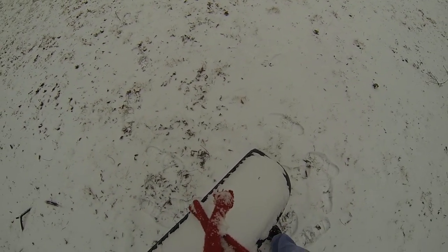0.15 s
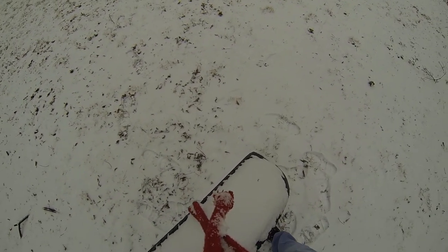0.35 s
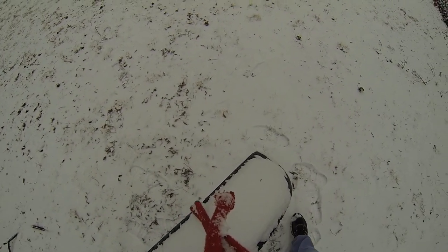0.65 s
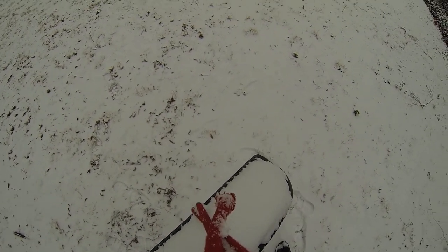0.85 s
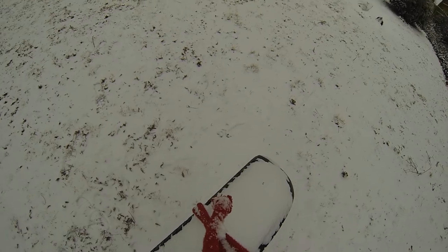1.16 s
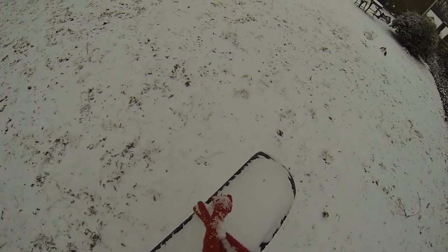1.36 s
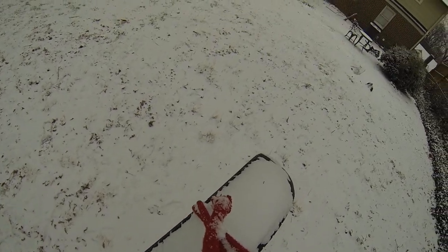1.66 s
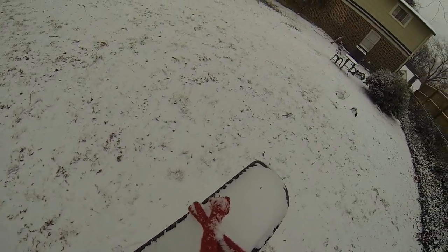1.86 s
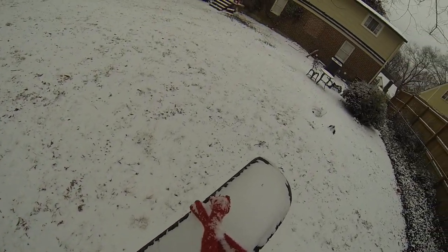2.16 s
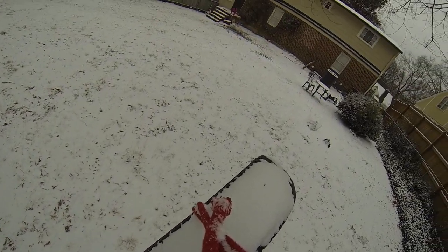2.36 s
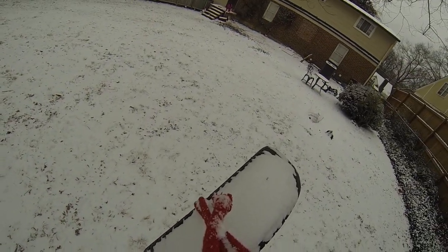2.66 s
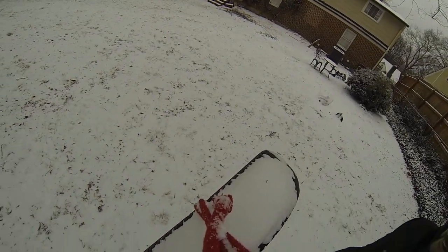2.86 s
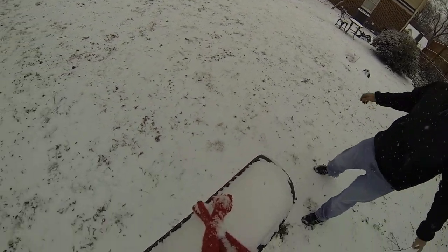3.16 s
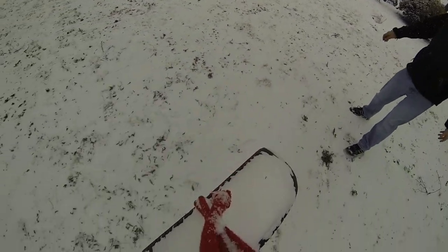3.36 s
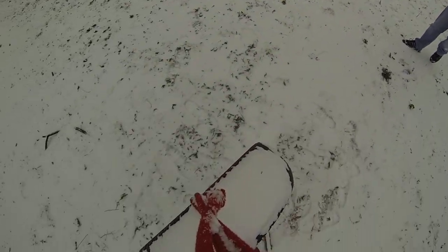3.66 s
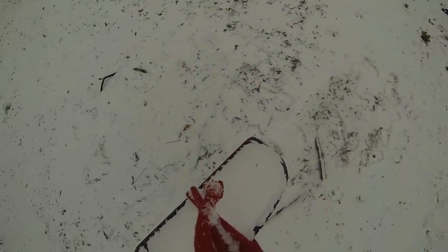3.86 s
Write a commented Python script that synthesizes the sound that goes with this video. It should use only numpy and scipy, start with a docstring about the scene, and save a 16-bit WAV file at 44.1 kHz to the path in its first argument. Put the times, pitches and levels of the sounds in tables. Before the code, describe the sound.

Low handling rumble and muffled wind rush swell in bursts, with dull knocks and thuds.

```python
"""A snowy yard, heard by a small camera in a sealed plastic housing on a board that is swung about.
Rushing air and grit are noise and sparse grains through the colour of the shell; the mount's bass
shaking is noise through resonances, its thuds are damped sines of sagging pitch. Dull knocks are
noise pushes ringing the cavity, ticks are cracks ringing shell modes; microphone hiss lies beneath."""
import sys
import numpy as np
from scipy import signal
from scipy.fft import rfft, irfft
from scipy.io import wavfile
from scipy.ndimage import uniform_filter1d

SR = 44100
rng = np.random.default_rng(int(sys.argv[2]) if len(sys.argv) > 2 else 0)


def decibels_to_gain(level_db):
    """Convert a level in decibels to a linear amplitude gain (20 dB per decade)."""
    exponent = np.asarray(level_db, float) / 20
    return 10 ** exponent


def file_out(sig):
    """Save sig as 16-bit WAV at sys.argv[1]."""
    # one column per channel
    cols = np.atleast_2d(sig).T
    # limit, then scale
    lim = np.clip(cols, -1, 1)
    pcm = np.round(lim * 32767).astype(np.int16)
    wavfile.write(sys.argv[1], SR, pcm)


N = 176400
T = np.arange(N) / SR

# colour of the shell around the microphone: [f/Hz, relative level/dB]
SHELL_COLOUR = [(200, -16.5), (290, -23), (365, -15), (470, -21.5), (800, -17), (1150, -7), (1450, 2),
                (1680, -3), (1850, -14.5), (2500, -24), (2750, -31.5), (3100, -35), (3900, -38.5),
                (4600, -39.5), (5500, -50.5), (9000, -65.5), (15000, -70)]


def level(x, db):
    """Scale to an rms level."""
    return x * decibels_to_gain(db) / np.sqrt(np.mean(x ** 2))


def curve(table, axis):
    """One column of a table, or of a list of tables, joined by straight lines in time."""
    rows = np.vstack(table)
    return np.interp(T, rows[:, 0], rows[:, axis])


def colour(x, points, lo_hz=0, hi_hz=SR):
    """Minimum-phase filter through (Hz, dB) points, soft-edged at lo_hz and hi_hz."""
    hz = np.maximum(np.arange(2049) * SR / 4096, 1)
    rows = np.array(points)
    db = np.interp(np.log(hz), np.log(rows[:, 0]), rows[:, 1])
    db -= 10 * np.log10((1 + (lo_hz / hz) ** 6) * (1 + (hz / hi_hz) ** 6))
    db -= 10 * np.log10(1 + (rows[0, 0] / hz) ** 4)  # roll-off below the first point
    # folding the cepstrum makes the response causal
    cepstrum = irfft(db * np.log(10) / 20)
    cepstrum[1:2048] *= 2
    cepstrum[2049:] = 0
    response = irfft(np.exp(rfft(cepstrum)))
    return signal.fftconvolve(x, response)[:N]


def band(x, hz, width_hz):
    """A resonance applied twice."""
    b, a = signal.iirpeak(hz, hz / width_hz, fs=SR)
    return signal.lfilter(b, a, signal.lfilter(b, a, x))


def walk(rate_per_s):
    """Random levels held 1 / rate_per_s and slewed twice; spread near 1."""
    hold = int(SR / rate_per_s)
    steps = np.repeat(rng.standard_normal(N // hold + 1), hold)
    return 1.3 * uniform_filter1d(uniform_filter1d(steps, hold), hold)[:N]


def add(out, t, x):
    """Mix x into out from time t."""
    i = int(t * SR)
    out[i:i + len(x)] += x[:N - i]


def rush():
    """Flickering air noise and grains of grit; body, cavity and treble waver partly separately."""
    # air over the housing: [t/s, relative level/dB, treble re cavity/dB, body re cavity/dB]
    air = [(0, -75, 5, -4), (.45, -69.5, -0.5, -1), (.7, -71, 2, 2), (.85, -61.5, 1.5, 0.5),
           (1.0, -53.5, -1.5, 0), (1.15, -49.5, 2, -2), (1.3, -44.5, 0.5, -6), (1.42, -44, 4.5, 0),
           (1.48, -49.5, 1.5, -2), (1.51, -51.5, -6.5, 5), (1.62, -55, -3.5, 3.5), (1.72, -56, -0.5, 3.5),
           (1.85, -50, 1.5, 2), (1.95, -43.5, -7.5, 6), (2.08, -48, -5, 5.5), (2.2, -53, -4, 2.5),
           (2.4, -53.5, -6, 6), (2.6, -52, -5.5, 6), (2.66, -60.5, -1, 5), (2.8, -54, -5, 2.5),
           (2.95, -47.5, -3.5, 2.5), (3.1, -38.5, -2.5, 2), (3.22, -38, -4, -1), (3.3, -42, -2, 2.5),
           (3.41, -46.5, 2, 0), (3.45, -43.5, -0.5, 2), (3.6, -39, -3, -1), (3.7, -40.5, 0, 1.5),
           (3.77, -42.5, 0.5, -7.5), (3.82, -43.5, 1, -1.5), (3.87, -38, 0, -5.5), (3.93, -42, 3.5, -8),
           (4, -43.5, 2.5, -3)]
    grit_per_s, grit_spread_db, grit_re_air_db = 1200, 3, 0.5
    shared_flicker_db, shared_per_s = 0.26, 45
    own_flicker_db, own_per_s = 0.79, 25.3

    grains = (rng.random(N) < grit_per_s / SR) * rng.standard_normal(N)
    grains *= decibels_to_gain(grit_spread_db * np.minimum(rng.exponential(size=N), 4))
    drive = rng.standard_normal(N) + level(grains, grit_re_air_db)
    shared_db = shared_flicker_db * walk(shared_per_s)

    def part(lo_hz, hi_hz):
        flicker = decibels_to_gain(shared_db + own_flicker_db * walk(own_per_s))
        return colour(drive, SHELL_COLOUR, lo_hz, hi_hz) * flicker

    body, cavity, treble = part(0, 780), part(900, 1708), part(2000, SR)
    mix = decibels_to_gain(curve(air, axis=3)) * body + cavity + decibels_to_gain(curve(air, axis=2)) * treble
    return decibels_to_gain(curve(air, axis=1) + 8.5) * mix / np.std(cavity)


def shake():
    """Board and mount modes pushed by random forces, their swells partly evened out."""
    # shaking by phase of the swing: [t/s, relative level/dB, upper re lower modes/dB]
    phases = [
        [(0.0, -47, -21), (0.054, -69, 8), (0.072, -63, -0.5), (0.206, -64, -3), (0.286, -52, 4),
         (0.368, -70, 18.5), (0.382, -56, -10), (0.414, -44, -13), (0.468, -54, -14), (0.648, -63, 3),
         (0.682, -48.5, -4), (0.766, -66, -21.5), (0.814, -48, -14), (0.846, -73, 20), (0.876, -58, 5),
         (0.904, -75, 19), (0.942, -50, -11), (1.012, -70.5, 17.5), (1.084, -48.5, -17), (1.118, -51, 3),
         (1.17, -52, -8), (1.24, -53, -1)],
        [(1.25, -61, -6), (1.288, -33, 2.5), (1.302, -30, -2), (1.342, -30, -14), (1.374, -40, 0),
         (1.4, -40, -12), (1.422, -52, 5), (1.442, -48.5, 3.5), (1.462, -57, 4), (1.488, -45, -2),
         (1.518, -54, 4.5), (1.544, -40, -7), (1.566, -38, 2), (1.594, -35.5, -7), (1.634, -47, 8.5),
         (1.668, -33.5, 0), (1.724, -40, -16), (1.738, -35.5, 2), (1.76, -28, 1), (1.792, -46, -2),
         (1.84, -41, 3)],
        [(1.85, -36.5, 1), (1.872, -19.5, 1.5), (1.902, -24, -1), (1.922, -18.5, -1.5), (1.968, -17.5, -5.5),
         (2.006, -30.5, 7.5), (2.05, -24, -10), (2.1, -37.5, 5), (2.124, -26, 6), (2.164, -35, 0),
         (2.268, -32, -10.5), (2.29, -49, -1), (2.314, -32.5, -9), (2.33, -29.5, -13), (2.358, -43, 9),
         (2.378, -34, -5.5), (2.444, -31.5, -11.5), (2.482, -41.5, -2), (2.568, -33.5, -5.5),
         (2.602, -42.5, 3.5), (2.64, -44.5, -0.5)],
        [(2.65, -53, 3), (2.68, -59, 5), (2.704, -45, -8), (2.724, -43, -12), (2.75, -57, 1), (2.84, -50, 5),
         (2.864, -57, -10), (2.9, -46, 3), (2.972, -52, 6.5), (3.066, -44.5, 2.5), (3.088, -48.5, 16),
         (3.112, -48, 5), (3.146, -46, 16), (3.188, -42, 0), (3.204, -37.5, 0), (3.222, -35.5, 8),
         (3.26, -46, 14.5), (3.298, -48, 7), (3.35, -33, 0.5), (3.384, -41, -8), (3.41, -32, 1.5)],
        [(3.42, -34.5, -4), (3.448, -25, 8), (3.486, -15.5, -9), (3.518, -23, 7.5), (3.552, -13.5, -12),
         (3.58, -24, 3.5), (3.6, -14.5, -16), (3.628, -19.5, -10.5), (3.652, -14, -1), (3.7, -11, -19.5),
         (3.746, -29, -12), (3.768, -30, -17), (3.782, -23, 4), (3.802, -11, -5), (3.83, -10, -13),
         (3.85, -9.5, -8.5), (3.894, -32, -5.5), (3.914, -30, -14), (3.93, -26.5, 2.5), (3.948, -16.5, 3),
         (4.0, -15, -4.5)],
    ]
    # lower modes of board and mount: [f/Hz, width/Hz, relative level/dB]
    low_modes = [(23.4, 12.3, -5), (40, 14.4, -2.5), (61.47, 14.6, -1.5)]
    # upper modes of board and mount: [f/Hz, width/Hz, relative level/dB]
    high_modes = [(112.3, 27.8, 0.5), (145.2, 30.5, -2.5), (214.6, 58, -12), (344.5, 61, -23),
                  (536, 150, -24)]
    flutter_db, flutter_per_s = 1.5, 30
    evening = 0.4  # 0 none, 1 nearly flat

    def swing(modes):
        x = sum(level(band(rng.standard_normal(N), hz, width_hz), db) for hz, width_hz, db in modes)
        envelope = uniform_filter1d(np.abs(signal.hilbert(x)), 600) / np.std(x)
        return level(x / (envelope + .15) ** evening, 0)

    shake_db = curve(phases, axis=1) - 0.5 + flutter_db * walk(flutter_per_s)
    return decibels_to_gain(shake_db) * (swing(low_modes) + decibels_to_gain(curve(phases, axis=2)) * swing(high_modes))


def hiss():
    """Steady coloured noise of the microphone."""
    # hiss spectrum: [f/Hz, relative level/dB]
    spectrum = [(200, -4.5), (400, -9), (900, -11.5), (1450, -2.5), (1900, -13), (2500, -20), (3100, -14),
                (4000, -22.5), (4800, -20.5), (6500, -26.5), (8500, -28), (10000, -24), (11000, -33.5),
                (12800, -26), (15000, -40)]
    return level(colour(rng.standard_normal(N), spectrum), -63.5)


def knocks():
    """One short rough push per knock drives both shell body and cavity, in its own balance."""
    # dull knocks: [t/s, relative level/dB, decay time constant/s, body re cavity drive/dB]
    pushes = [(0.016, -45, 0.0063, 5.5), (0.1336, -49.5, 0.01, 9.5), (0.2995, -48.5, 0.0054, 19),
              (0.876, -48.5, 0.011, 14.5), (0.9106, -39, 0.006, 14), (1.2915, -28.5, 0.006, 11.5),
              (1.6412, -41, 0.0081, 18), (1.7423, -31, 0.0078, 10), (1.7993, -31.5, 0.006, 10),
              (1.8196, -25.5, 0.007, 15.5), (1.831, -30, 0.0067, 12), (1.866, -15, 0.0051, 9.5),
              (1.8986, -39, 0.018, 5), (1.923, -16, 0.006, 6), (1.945, -24.5, 0.0056, 5),
              (2.0112, -27, 0.0076, 14.5), (2.028, -37, 0.0041, 15), (2.1083, -29.5, 0.006, 17),
              (2.3065, -35, 0.0085, 13), (2.6026, -40, 0.0036, 15), (3.0724, -23, 0.0027, 11.0),
              (3.123, -25.5, 0.0043, 8), (3.208, -22.5, 0.0056, 6), (3.3174, -26, 0.006, 9),
              (3.336, -27, 0.006, 8), (3.363, -28, 0.0051, 3.5), (3.4257, -27, 0.006, 17.5),
              (3.4381, -16.5, 0.0062, 15.5), (3.486, -22.5, 0.017, 8), (3.5067, -15, 0.006, 10.5),
              (3.5274, -24, 0.0054, 10), (3.5594, -15.5, 0.0056, 8), (3.5844, -25, 0.006, 7.5),
              (3.6, -26.5, 0.0045, 11.0), (3.6434, -14.5, 0.0052, 16), (3.68, -27, 0.0077, 15),
              (3.702, -28, 0.006, 11.5), (3.752, -27, 0.0051, 9.5), (3.7884, -14, 0.004, 15),
              (3.7954, -9.5, 0.0055, 10.5), (3.826, -23.5, 0.0064, 15.5), (3.8414, -28, 0.004, 12),
              (3.897, -20.5, 0.0044, 6), (3.895, -17.5, 0.006, 5), (3.908, -25, 0.003, 10),
              (3.941, -21, 0.0028, 12), (3.9483, -11.5, 0.006, 10), (3.986, -31, 0.0042, 17)]
    rise_s, cavity_top_hz, body_top_hz = 0.0018, 2580, 670
    cavity, body, t = np.zeros(N), np.zeros(N), T[:SR // 20]
    for start_s, db, decay_s, body_db in pushes:
        noise = rng.standard_normal(len(t))
        push = decibels_to_gain(db) * noise * np.exp(-t / decay_s) * (1 - np.exp(-t / rise_s))
        add(cavity, start_s, push)
        add(body, start_s, decibels_to_gain(body_db) * push)
    cavity = colour(cavity, SHELL_COLOUR, 900, cavity_top_hz)
    body = colour(body, SHELL_COLOUR, 0, body_top_hz)
    return decibels_to_gain(16) * (cavity + body)


def thuds():
    """Each thud through the mount is a damped swing whose pitch sags."""
    # thuds: [t/s, level before rise and decay/dB, nominal f/Hz, t60/s]
    blows = [(.289, -35, 101, 0.16), (0.403, -28, 58, 0.096), (1.288, -16, 114, 0.097),
             (1.743, -12, 126, 0.044), (1.819, -11, 156, 0.033), (1.869, -10.5, 120.8, 0.027),
             (1.916, -9.5, 110, 0.14), (2.111, -12, 154.4, .1), (2.312, -18, 110, 0.057),
             (3.214, -20, 127, 0.18), (3.438, -25.5, 140, .08), (3.49, -6, 103, 0.092),
             (3.512, -2.5, 115, 0.13), (3.644, 3.5, 106.5, 0.043), (3.794, 7, 75.8, 0.041),
             (3.828, -7.5, 58.1, 0.14), (3.945, -2.5, 90.4, 0.14)]
    rise_s, sag, sag_s = 0.004, 0.45, 0.02
    out, t = np.zeros(N), T[:SR // 4]
    # pitch falls from about 1.2 to 0.55 of nominal
    cycles_per_hz = t * (1 - sag) + sag * 0.029 * (1 - np.exp(-t / sag_s))
    for start_s, db, hz, t60_s in blows:
        envelope = decibels_to_gain(db - 60 * t / t60_s) * (1 - np.exp(-t / rise_s))
        add(out, start_s, -envelope * np.cos(2 * np.pi * hz * cycles_per_hz))
    return out


def ticks():
    """Each tick is a dry crack plus ringing shell modes, newly tuned; its tilt sets the brightness."""
    # ticks on the shell: [t/s, relative level/dB, brightness/(dB per octave)]
    contacts = [(0.356, -15, 2.5), (0.3943, -46, 1), (0.3966, -34, 3), (0.41, -54.5, -2.0),
                (0.4193, -41, 4), (0.447, -45, 4), (0.4614, -62, -2.0), (0.4754, -53, 8), (1.2235, -45, 0),
                (1.248, -54, -2.0), (1.264, -38, -10), (1.2656, -39, -2.0), (1.275, -24.5, 5.5),
                (1.3477, -45, -5), (1.3834, -52, -2.0), (1.4207, -32, 3), (1.4284, -52, -2.0),
                (1.7992, -43, -8), (1.8885, -51, -2.0), (1.9035, -42, -9), (1.9123, -42, -14),
                (1.926, -25.5, -13), (1.9344, -28, -2.5), (1.9424, -44, -10), (2.0387, -34, -3.5),
                (2.0642, -45, -4), (2.1745, -60, -7), (2.1854, -46, -2.0), (2.2851, -42, -8),
                (2.3044, -45, -5), (2.355, -47, -2.0), (3.014, -46, 1), (3.0433, -29.5, -7.5),
                (3.0724, -28, -10.5), (3.1525, -60, 9), (3.188, -37.5, -15), (3.3368, -63, -3),
                (3.642, -30, -17), (3.6494, -33.5, -11.5), (3.7213, -34, -11), (3.7525, -31, -5),
                (3.793, -54.5, -2.0), (3.8027, -31, -4.5), (3.816, -40.5, -1), (3.843, -34.5, -5),
                (3.8524, -34, 4), (3.8574, -45.5, 3), (3.8754, -39, -4), (3.8835, -34, -5),
                (3.898, -26.5, -8.5), (3.91, -28, -4), (3.9543, -49, -2.0)]
    # modes of the shell: [f/Hz, relative level/dB, t60/s]
    modes = [(1325, -10.5, 0.03), (1586, -16, 0.016), (1917, -14, 0.026), (2250, -20.5, 0.01),
             (2550, -13, .02), (3177, -13, 0.016), (3167, -13, 0.013), (3600, -11, 0.015),
             (4120, -12.5, 0.016), (4600, -10, .012), (5300, -10, 0.0062), (6950, -13.5, 0.0068),
             (9400, -19.5, .005), (10640, -16, 0.0043)]
    scatter_db, detune, rise_s = 2, .03, .0003
    crack_db, crack_decay_s, crack_top_hz = 1, .0008, 11100
    out, t = np.zeros(N), T[:2048]
    hz, db, t60_s = np.array(modes).T[:, :, None]
    # crack spectrum about 4 kHz, tilt held below 1.2 kHz
    octaves = np.log2(np.maximum(np.arange(1025) * SR / 2048, 1200) / 4000)
    top_cut = 1 + (4000 * 2 ** octaves / crack_top_hz) ** 4
    for start_s, tick_db, tilt_db in contacts:
        level_draw, tune_draw, phase_draw = rng.standard_normal((3, len(hz), 1))
        ring_db = db + tilt_db * np.log2(hz / 4000) + scatter_db * level_draw - 60 * t / t60_s
        ring = decibels_to_gain(ring_db) * np.sin(2 * np.pi * hz * (1 + detune * tune_draw) * t + 2 * phase_draw)
        noise = np.diff(rng.standard_normal(len(t)), prepend=0)
        crack = irfft(rfft(noise) * decibels_to_gain(tilt_db * octaves) / top_cut)
        crack *= np.exp(-t / crack_decay_s) / (1 + decibels_to_gain(tilt_db * 1.3))
        tick = (ring.sum(axis=0) + decibels_to_gain(crack_db) * crack) * (1 - np.exp(-t / rise_s))
        add(out, start_s + .0005, decibels_to_gain(tick_db - 2.5) * tick)
    return out


def scene():
    """All sources at one microphone."""
    return (rush() + shake() + hiss() + knocks() + thuds() + ticks())[None]


def band_limit(x):
    """A steep low-pass at the top of the band."""
    return signal.sosfilt(signal.butter(12, 15800, fs=SR, output="sos"), x)


def record(dry):
    """The loudest swings are rounded by a tanh curve."""
    rounded = np.tanh(.5 * dry) / .5
    return band_limit(rounded)


dry = scene()
out = record(dry)
file_out(out)
```